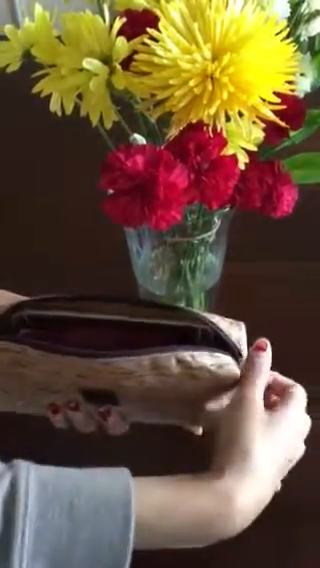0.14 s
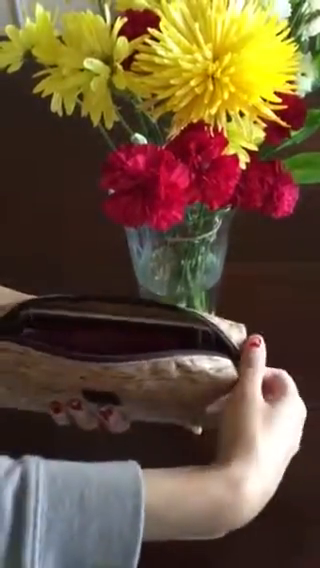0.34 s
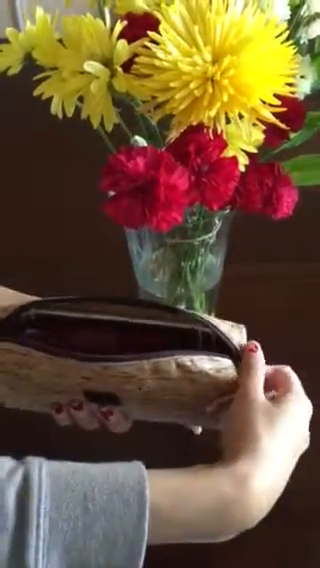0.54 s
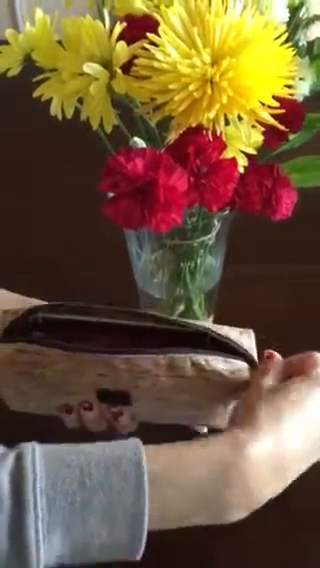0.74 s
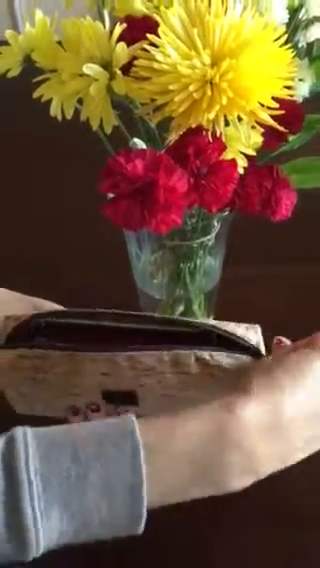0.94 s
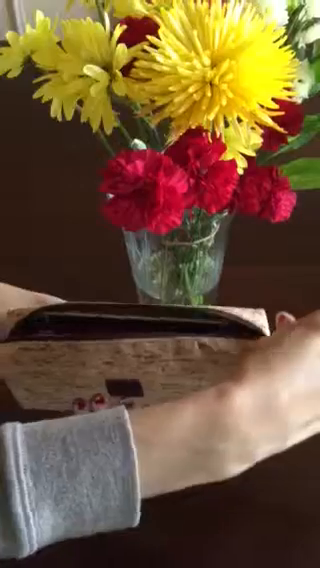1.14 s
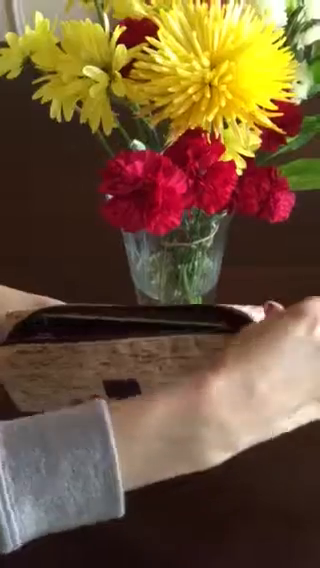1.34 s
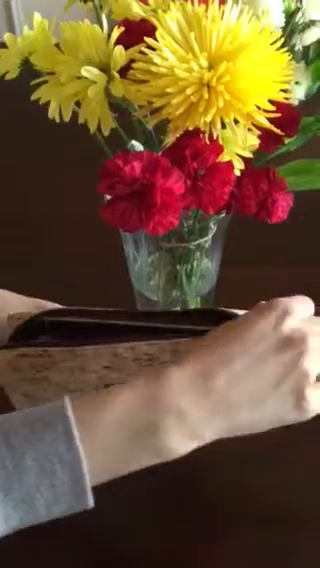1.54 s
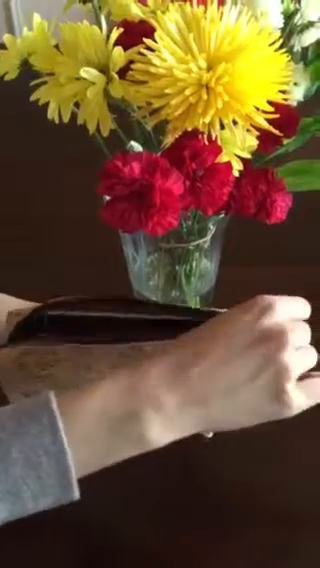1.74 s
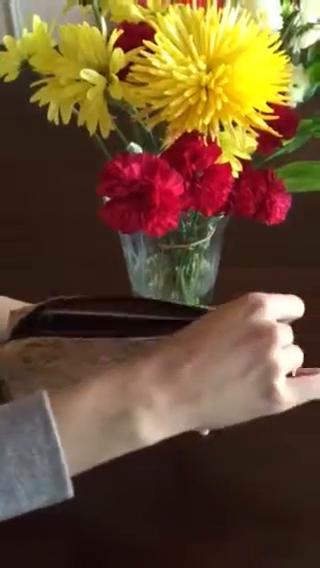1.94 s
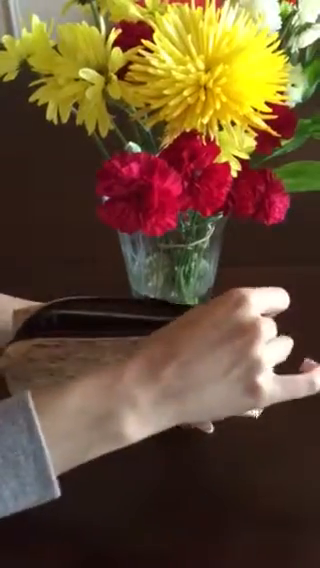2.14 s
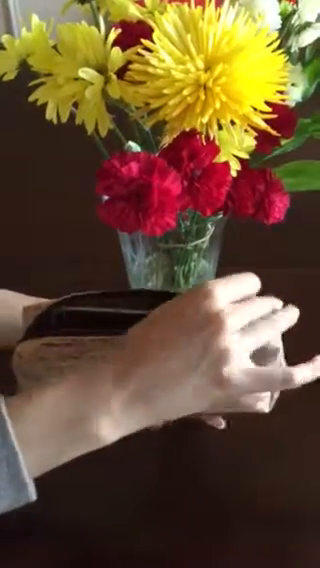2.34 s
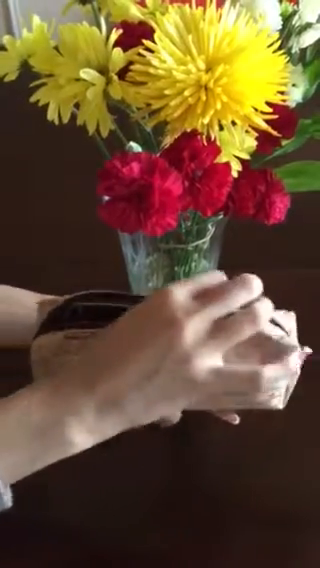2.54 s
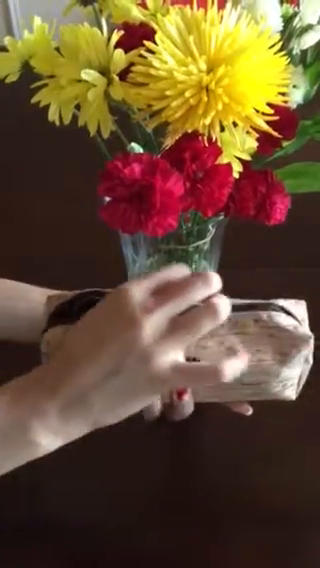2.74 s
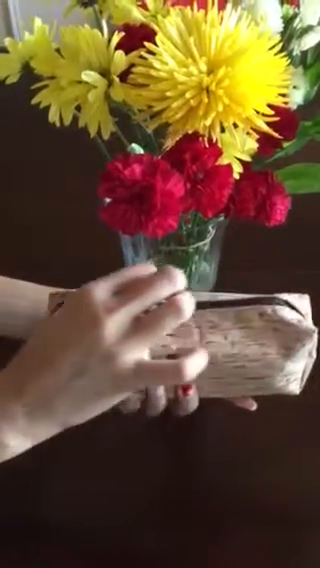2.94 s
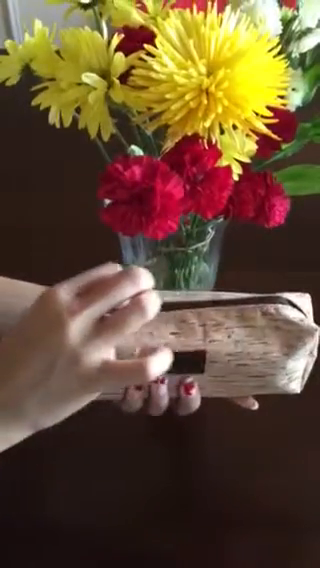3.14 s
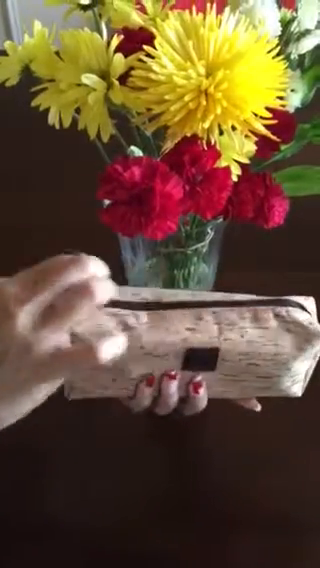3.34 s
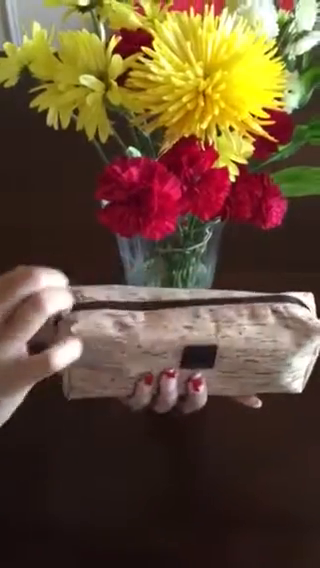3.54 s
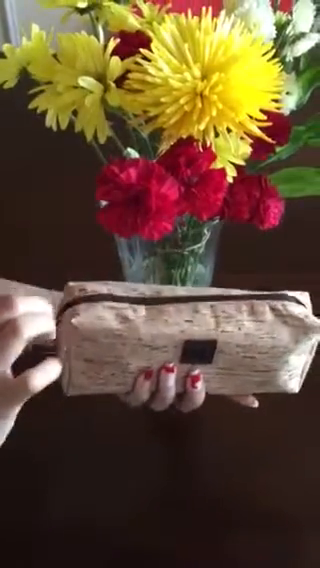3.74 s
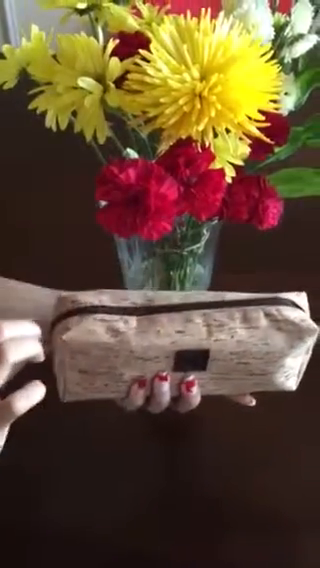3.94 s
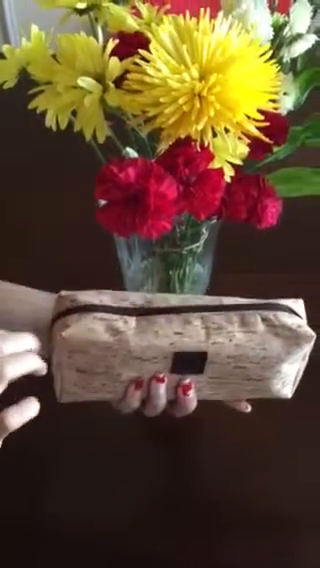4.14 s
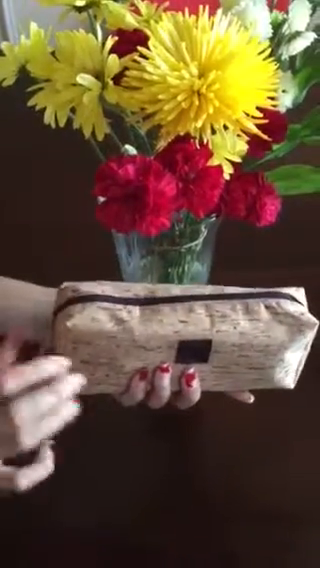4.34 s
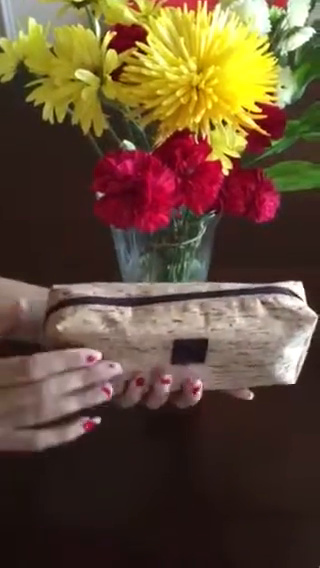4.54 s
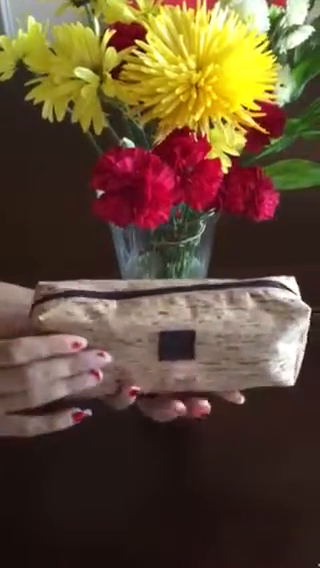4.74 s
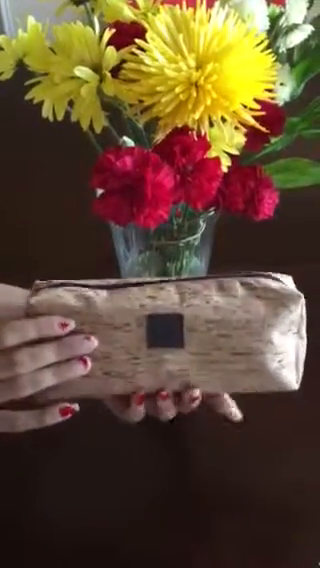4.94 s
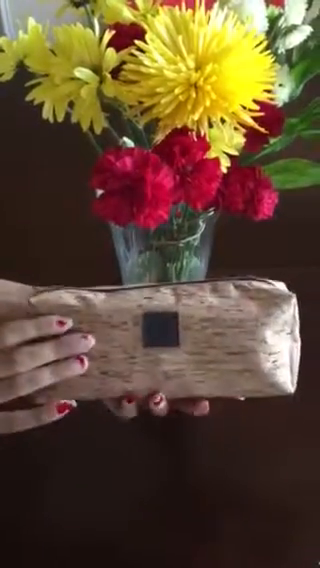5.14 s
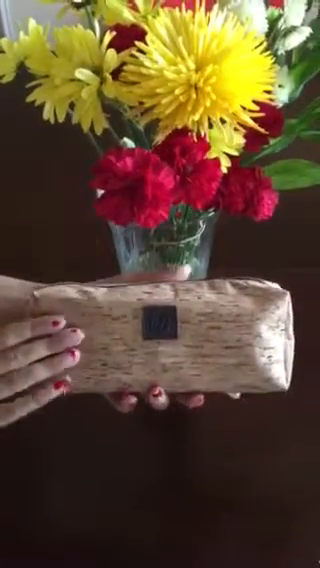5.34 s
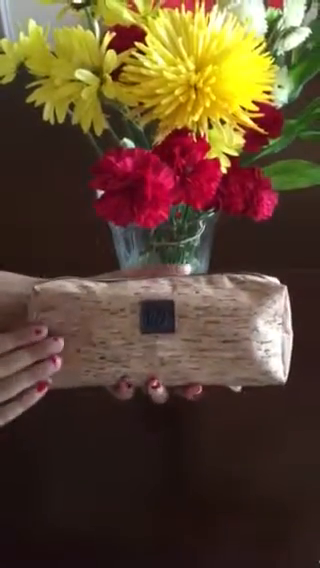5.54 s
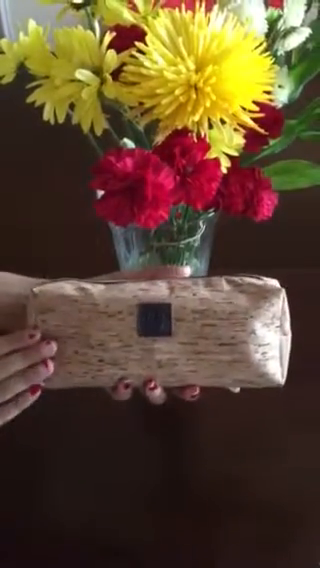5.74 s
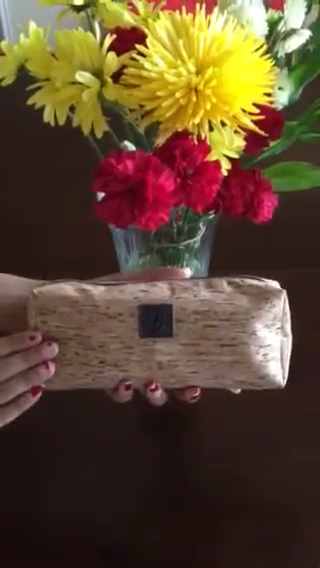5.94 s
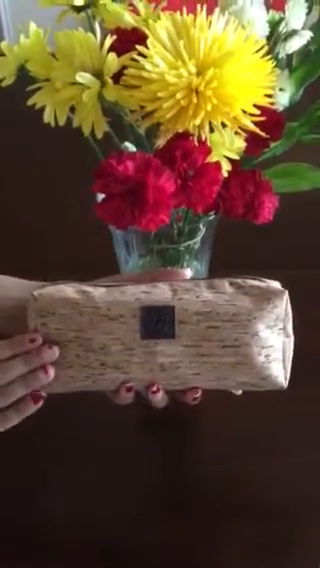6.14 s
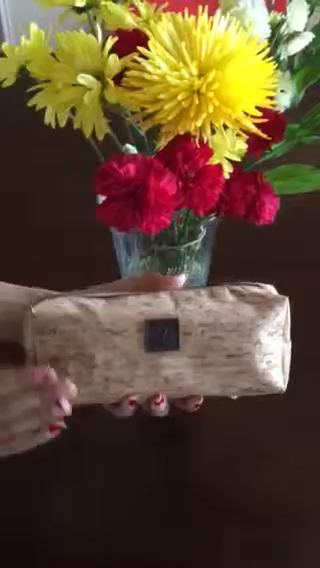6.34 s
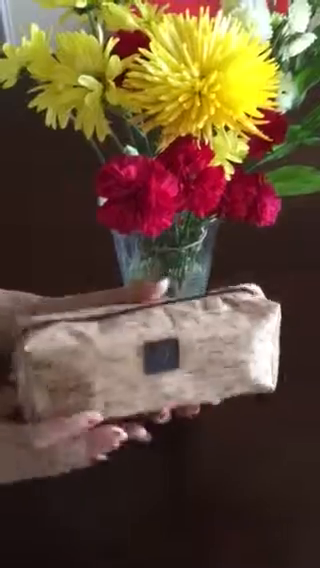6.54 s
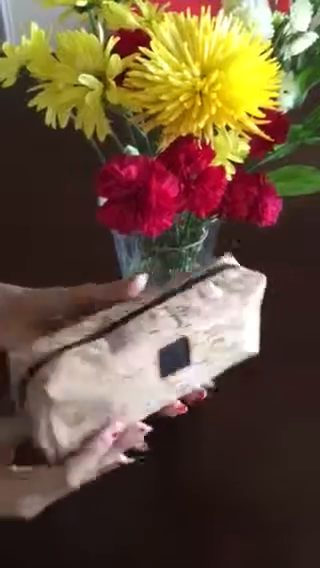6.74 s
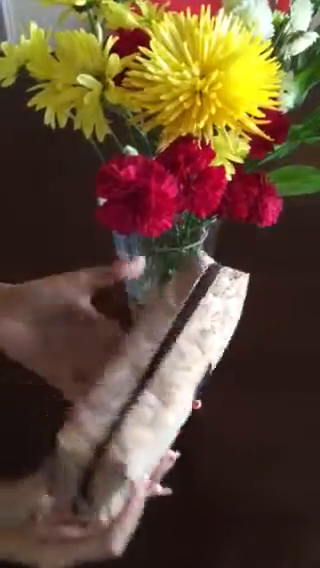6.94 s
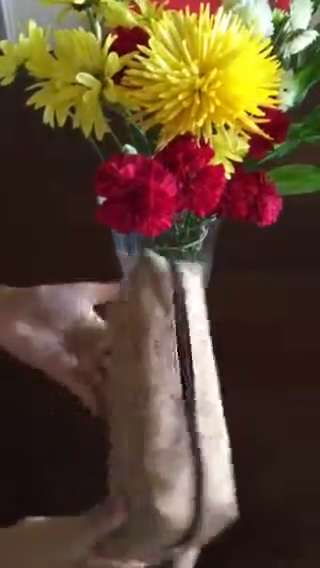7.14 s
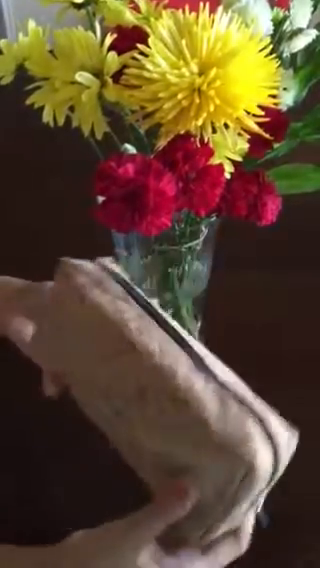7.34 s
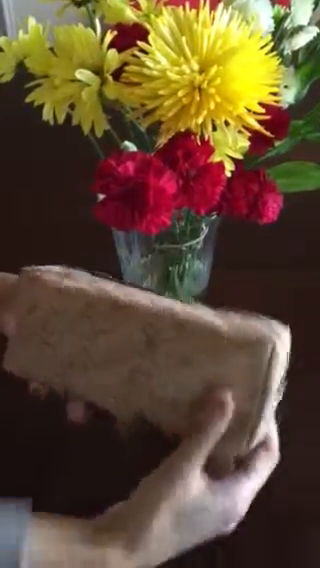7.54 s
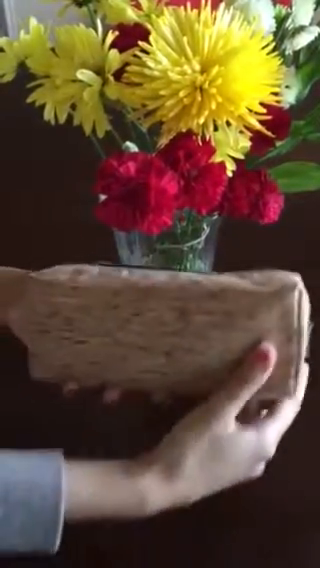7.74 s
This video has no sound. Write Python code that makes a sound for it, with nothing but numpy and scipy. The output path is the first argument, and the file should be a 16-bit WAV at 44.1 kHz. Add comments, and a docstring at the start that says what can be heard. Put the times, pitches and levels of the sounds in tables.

```python
"""Zipping a cork pouch shut

A hand closes a cork pouch in a quiet room. Fingers tug the slider over a few teeth and click its metal tab.
Then the slider ticks over the teeth, speeds up into an uneven buzz, stalls at the far corner
and closes with a last rasp. Each tooth is a tiny push and scrape that rings the pouch.
Palms brush over the cork as shaped hiss, fingernails tap it and it crinkles in tiny random ticks.
Filtered noise makes the room's hiss and rumble and a wavering hum from something in the house."""
import sys
import numpy as np
from scipy import signal
from scipy.fft import rfft, irfft, next_fast_len
from scipy.io import wavfile
from scipy.ndimage import map_coordinates

SR = 44100
rng = np.random.default_rng(int(sys.argv[2]) if len(sys.argv) > 2 else 0)


def transcribe(u):
    """Save the signal u as a 16-bit wav file named by the first command-line argument.

    u: samples, shape (n,) or (channels, n), limited to [-1, 1]; the rate is SR.
    q: integer samples, one column per channel.
    """
    v = np.clip(np.atleast_2d(u).T, -1, 1)
    q = np.round(v * 32767).astype(np.int16)
    wavfile.write(sys.argv[1], SR, q)


N = 342789
TIME = np.arange(N) / SR  # seconds

# the room's hiss: (frequency [Hz], level [dB])
AIR_SPECTRUM = [(150, -15.5), (300, -9), (450, -13), (700, -14), (1100, -15.5), (2000, -17), (5000, -24),
                (10000, -27), (15000, -30.5)]
# the rumble of the house: (frequency [Hz], level [dB])
RUMBLE_SPECTRUM = [(20, -21.5), (33, -15), (45, -1.5), (70, 2), (100, 1), (135, -6), (165, -12.5),
                   (230, -19), (310, -30), (800, -84)]
# how long the room's answer lasts: (frequency [Hz], time to fall by 60 dB [s])
ROOM_DECAY = [(200, 0.16), (1000, 0.18), (3000, 0.14), (12000, 0.16)]

# hiss of skin on cork: (frequency [Hz], level [dB])
CORK_SPECTRUM = [(500, -34), (1200, -5), (3000, 2), (6000, 2), (15500, 1.5)]
# palms slide over the cork: (middle [s], length [s], level [dB], lift of the hiss's peak [dB])
PALM_STROKES = [(0.376, 0.14, -72.5, -3), (5.124, 0.5, -68.5, -2), (5.346, 0.05, -75, 3),
                (5.564, 0.28, -69.5, 6), (6.41, 0.09, -72, 5), (6.625, 0.19, -64.5, 7),
                (6.86, 0.22, -68, -1.5), (7.554, 0.4, -73, 0)]
STROKE_FLATNESS = 3.6  # 2 gives a bell-shaped swell, more a flatter top
HISS_HZ, HISS_OCTAVES = 9600, 0.35  # centre and width of the hiss's peak (a dip where the lift is negative)

# the cork crinkles while it is gripped and turned: (start [s], end [s], relative level [dB])
CRINKLE_SPANS = [(4.896, 5.645, -86.5), (6.752, 7.307, -79.5), (7.452, 7.71, -81)]
# the cork's skin, ticked or tapped: (frequency [Hz], level [dB])
SKIN_SPECTRUM = [(150, -12), (600, 1.5), (1800, 3.5), (3500, 1), (7000, -8.5), (15000, -22.5)]
# fingernails tap the cork: (time [s], relative level [dB], scuff [s], ring [Hz], lift [dB])
NAIL_TAPS = [(4.394, -38.5, 0.0043, 2500, 8), (4.4073, -39, 0.0018, 2660, 15),
             (4.512, -44.5, 0.0026, 4060, 6), (5.111, -41.5, 0.0011, 1800, 5),
             (6.882, -51, 0.0023, 4170, 15), (7.114, -47, 0.0011, 3430, 10),
             (7.498, -49.5, 0.0012, 4270, 8), (7.611, -42.5, 0.0042, 2430, 8),
             (7.624, -44.5, 0.0013, 4300, 5)]

# clicks of the pull tab, each favouring two resonances:
# (time [s], relative level [dB], low ring [Hz], lift [dB], high ring [Hz], lift [dB])
TAB_CLICKS = [(1.744, -37, 805, 16, 1240, 18), (1.750, -28, 1300, 20.5, 4440, -2),
              (1.7518, -23, 775, 20, 1250, 16), (1.866, -28.5, 1480, 9.5, 2660, 11)]
# the tab's overall tone: (frequency [Hz], level [dB])
TAB_SPECTRUM = [(120, -40), (320, 5.5), (480, 0.5), (750, 7), (1000, -1.5), (1550, 0.5), (3400, -4.5),
                (4300, -0.5), (7000, -16.5), (15000, -18)]
# the metal tab, flicked free once, rings on: (frequency [Hz], level [dB], time to fall by 60 dB [s])
FREE_TAB_MODES = [(4350, -63, 0.099), (5850, -61, 0.1)]
FLICK_S = 1.751

# the voice of the pouch, its cavity strongest: (frequency [Hz], level [dB])
POUCH_SPECTRUM = [(100, -33), (170, -2.5), (330, 2.5), (460, -3.5), (620, 2.5), (800, 1), (1050, -4.5),
                  (1550, -9.5), (1900, -11.5), (2280, -18.5), (2700, -19.5), (3200, -20.5), (3600, -24),
                  (5000, -31), (6000, -29), (7500, -35.5), (15000, -42)]
# boom of the walls, strongest with the slider at the corners: (time [s], level against the rasp [dB])
WALL_BOOM = [(1.1, 1.5), (1.36, -8.5), (1.49, 0.5), (2.05, 4.5), (2.2, 6.5), (2.45, 1), (2.85, -6),
             (3.3, -16.5), (3.44, -6), (3.7, -7.5), (3.87, -1.5)]
# the spans of cork that the slider sets ringing, one after another: (time [s], frequency [Hz], lift [dB])
CORK_PANELS = [(0.12, 640, 3.5), (1.1, 1130, 3), (1.5, 445, 10.5), (2.05, 1530, 7.5), (2.17, 620, 7.5),
               (2.35, 372, 1.5), (2.5, 1470, 13), (2.66, 840, 6.5), (2.82, 2370, 7), (2.98, 2090, 3.5),
               (3.14, 1200, 7), (3.37, 1400, 10), (3.45, 698.8, 4), (3.82, 1510, 1)]
PANEL_OCTAVES = 0.19  # width of a panel's resonance
# narrow resonances (and one gap) of the pouch and the slider: (frequency [Hz], lift [dB])
NARROW_RINGS = [(245, -10), (329, 6), (690, 4.5), (788, 5), (860, 6.5), (1301, 3), (1880, 4.5), (2075, 4),
                (5560, 5)]
RING_OCTAVES = 0.022  # their width
# two bright resonances of the toothed tapes glide as the slider travels:
# (time [s], low ring [Hz], lift [dB], high ring [Hz], lift [dB])
TAPE_GLIDES = [(1.5, 2850, 5, 4150, 1.5), (2.1, 2930, 11, 4150, 2), (2.27, 3000, 7, 4100, 12),
               (2.43, 3110, 10, 4300, 4), (2.6, 3070, -3, 4400, -3), (2.83, 2480, 6.5, 4746, 5),
               (3.05, 2561, 5, 4020, 8.5), (3.31, 2715, 11, 3804, 1.5), (3.55, 2901, 5, 4296, 2),
               (3.85, 2641, 5.5, 4800, 5)]
TAPE_OCTAVES = 0.064  # their width
# creases add small random peaks and dips that change along the way: depth, spacing, pace
CREASE_DB, CREASE_HZ, CREASES_PER_S = 3, 166.7, 7

# short tugs drag the slider over a few teeth:
# (time [s], teeth [count], speed [teeth/s], first tooth [relative dB], last tooth [relative dB],
# treble against the rasp [dB])
SLIDER_TUGS = [(0.114, 2, 35, -43, -45.5, -5), (1.086, 4, 100, -28, -37.5, -13),
               (1.131, 1, 70, -29, -31, -25), (1.225, 2, 62, -35.5, -40, -17),
               (1.353, 3, 108, -30.5, -36, -11.5), (1.427, 2, 81, -32.5, -38, -15),
               (1.480, 3, 110, -26, -36, -1.5), (1.518, 2, 22, -34.5, -36.5, -9),
               (2.004, 3, 83, -32, -30, -8.5), (2.041, 6, 78, -32.5, -33.5, -6.5),
               (2.138, 1, 80, -32, -28, -1.5), (2.15, 3, 59, -40, -34.5, -10), (2.209, 5, 60, -37, -33, -7),
               (3.513, 4, 74, -32, -34, -14.5), (3.580, 4, 92, -29.5, -34.5, -12.5),
               (3.637, 3, 62, -27, -29, -14), (3.694, 1, 47, -30.5, -30.5, -18),
               (3.715, 3, 94, -33, -27, -15)]
# the long pull along the top:
# (time [s], speed [teeth/s], relative rasp level [dB], the teeth's treble against the rasp [dB])
TOP_PULL = [(2.296, 65, -52, -7), (2.351, 110, -49, -7), (2.39, 97, -54, -4), (2.492, 78, -50, -8),
            (2.532, 100.5, -49.5, -4), (2.605, 180, -42.5, -6), (2.655, 165, -39, -7),
            (2.70, 91, -41, -8.5), (2.745, 129, -42, -5), (2.80, 119.6, -42.5, -7.5), (2.852, 143, -40, -8),
            (2.906, 106, -46, -6), (3.034, 81, -48, -8), (3.15, 93.4, -45.5, -7), (3.2, 112, -44.5, -6.5),
            (3.28, 91.5, -48.5, -6.5), (3.381, 234, -38, -9), (3.44, 166, -40.5, -9),
            (3.505, 83.6, -52, -6.5)]
# the last quick pull round the far corner:
# (time [s], speed [teeth/s], relative rasp level [dB], the teeth's treble against the rasp [dB])
CORNER_PULL = [(3.752, 87.65, -46, -10), (3.775, 148.3, -42, -11.5), (3.818, 372.5, -36.5, -10),
               (3.86, 327.6, -42, -6.5), (3.895, 181, -53, -23)]
EASY_SPEED = 105  # teeth per second of an easy pull
# the partner tooth against the first at easy speed, its growth with speed, its limit before bunching
PARTNER_DB, PARTNER_DB_PER_OCTAVE, PARTNER_MAX_DB = -11.5, 10.5, -6
FIZZ_DB, FIZZ_DB_PER_OCTAVE = -9.5, 4.5  # lift of the top treble at easy speed, its growth with speed
# the tapes bunch before the far corner, so the partner teeth catch harder
BUNCH_S, BUNCH_WIDTH_S, BUNCH_DB = 3.34, 0.079, 8

TOP_HZ = 15400  # the recorder's band limit


def amp(db):
    """Turn decibels into gain."""
    return 10 ** (np.asarray(db) / 20)


def unit(x):
    """Scale to an average strength (rms) of 1."""
    return x / np.sqrt(np.mean(x ** 2) + 1e-20)


def along(points, hz):
    """Read a table of (frequency, value) on a logarithmic frequency axis."""
    f, v = np.transpose(points)
    return np.interp(np.log(hz + 1), np.log(f + 1), v)


def at(rows, s):
    """Read the columns of a table of curves at time s."""
    knots, *columns = np.transpose(rows)
    return [np.interp(s, knots, column) for column in columns]


def bump(hz, centre, octaves):
    """Draw a bell of height 1 on a logarithmic frequency axis."""
    return np.exp(-.5 * (np.log2((hz + 1) / centre) / octaves) ** 2)


def filtered(x, response):
    """Multiply the spectrum of x by a function of frequency."""
    size = next_fast_len(N + SR // 2)
    hz = np.fft.rfftfreq(size, 1 / SR)
    return irfft(rfft(x, size) * response(hz), size)[:N]


def noise(spectrum):
    """Make coloured noise of rms 1."""
    return unit(filtered(rng.standard_normal(N), lambda hz: amp(along(spectrum, hz))))


def wobble(rate):
    """Draw a smooth random curve through `rate` random points a second."""
    points = rng.standard_normal(int(N * rate / SR) + 4)
    return map_coordinates(points, [TIME * rate])


def ring(gain, lag=0.000721, size=2048):
    """Make a struck body's ring, of energy 1; bending waves bring 1 kHz lag seconds late, the bass later still."""
    hz = np.fft.rfftfreq(size, 1 / SR)
    # folding the cepstrum makes each frequency start as early as the spectrum allows
    cepstrum = irfft(np.log(np.maximum(gain(hz), 1e-6)))
    cepstrum[1:size // 2] *= 2
    cepstrum[size // 2 + 1:] = 0
    bending = 4 * np.pi * np.sqrt(1000 * hz)
    h = irfft(np.exp(rfft(cepstrum) - 1j * lag * bending))
    return h / np.linalg.norm(h)


def contact(scrape_hz, rise, fall, grit=1.0, rattle=0.0, rattle_s=0.001834, size=2048):
    """Make a sharp push, rattling just before and after, in a swell of scraping that takes treble by grit."""
    t = (np.arange(size) - size // 2) / SR
    swell = np.exp(-np.abs(t) / np.where(t < 0, rise, fall))
    scrape = rng.standard_normal(size) * swell
    push = 1.0 * (t == 0)
    rattle_times = rattle_s * np.array([-1, 1]) * (.5 + rng.random(2))
    places = np.searchsorted(t, np.clip(rattle_times, t[0], t[-1]))
    push[places] += rattle * rng.choice([-1, 1], 2)
    push /= np.linalg.norm(push)
    scrape /= np.linalg.norm(scrape)
    # the angle turns from push (0) towards scrape as the frequency climbs
    angle = min(grit, 1) * np.arctan(np.fft.rfftfreq(size, 1 / SR) / scrape_hz)
    return irfft(np.cos(angle) * rfft(push) + np.sin(angle) * rfft(scrape))


def add(track, s, touch, body):
    """Mix a contact, centred on time s and rung through a body, into the track."""
    sound = signal.fftconvolve(touch, body)
    start = max(round(s * SR) - len(touch) // 2, 0)
    part = track[start:][:len(sound)]
    part += sound[:len(part)]


def room(x, delay=.009):
    """The table and walls answer after a short gap (seconds) with a fading wash of noise."""
    hz, t, z = signal.stft(rng.standard_normal(SR // 2), SR, nperseg=256)
    decay = amp(-60 * t / along(ROOM_DECAY, hz)[:, None])
    tail = signal.istft(z * decay, SR, nperseg=256)[1]
    tail = np.pad(tail / np.linalg.norm(tail), (round(delay * SR), 0))
    return signal.fftconvolve(x, tail)[:N]


def background(air_db=-72, rumble_db=-60, hum_hz=119, hum_width_hz=4, hum_db=-57.5, whine_hz=330, whine_db=-87):
    """Faint hiss, the rumble of the house and a wavering hum with a thin tone above it, all from noise."""
    def tone(centre):
        return unit(filtered(rng.standard_normal(N), lambda hz: 1 / (1 + ((hz - centre) / hum_width_hz) ** 2)))

    # keep only the phase of the narrow noise, then give it a new wavering level
    steady = np.cos(np.angle(signal.hilbert(tone(hum_hz))))
    drone = steady * amp(5.2 * wobble(12.0))
    hum = unit(filtered(drone, lambda hz: bump(hz, hum_hz, 0.54)))
    rumble = unit(noise(RUMBLE_SPECTRUM) * amp(1.8 * wobble(6)))
    air = noise(AIR_SPECTRUM)
    return amp(air_db) * air + amp(rumble_db) * rumble + amp(hum_db) * hum + amp(whine_db) * tone(whine_hz)


def palms(grain_db=1.5, flutter_db=1.3):
    """Skin slides over the grain of the cork with a soft hiss that swells, catches and fades."""
    skin = noise(CORK_SPECTRUM) * amp(grain_db * wobble(400) + flutter_db * wobble(45))
    out = np.zeros(N)
    for s, length, db, lift_db in PALM_STROKES:
        swell = np.exp(-np.abs(2 * (TIME - s) / length) ** STROKE_FLATNESS)
        hiss = unit(filtered(skin, lambda hz: amp(lift_db * bump(hz, HISS_HZ, HISS_OCTAVES))))
        out += amp(db) * swell * hiss
    return out


def crinkles(per_second=90, scatter_db=4):
    """The bending cork gives off tiny ticks at random, each ringing its skin."""
    grip = sum(amp(db) * (TIME > start) * (TIME < end) for start, end, db in CRINKLE_SPANS)
    strength = amp(scatter_db * np.clip(rng.standard_normal(N), -2, 2))
    ticks = (rng.random(N) < per_second / SR) * strength
    skin = ring(lambda hz: amp(along(SKIN_SPECTRUM, hz)))
    return grip * unit(signal.fftconvolve(ticks, skin)[:N])


def nails(level_db=10, octaves=0.15, lag=0.00034):
    """Fingernails land on the cork: a clean tick, or a short scuff when they glance off."""
    out = np.zeros(N)
    for s, db, scuff_s, ring_hz, lift_db in NAIL_TAPS:
        body = ring(lambda hz: amp(along(SKIN_SPECTRUM, hz) + lift_db * bump(hz, ring_hz, octaves)), lag=lag)
        touch = contact(scrape_hz=500, rise=scuff_s, fall=scuff_s)
        add(out, s, amp(db + level_db) * touch, body)
    return out


def jingle(attack_s=0.00055):
    """The free metal tab rings thinly: fading sine waves, one for each way it vibrates."""
    t = np.maximum(TIME - FLICK_S, 0)
    modes = sum(amp(db - 60 * t / t60) * np.sin(2 * np.pi * hz * t) for hz, db, t60 in FREE_TAB_MODES)
    return (1 - np.exp(-t / attack_s)) * modes


def clicks(level_db=10, octaves=0.25, rub_db=-12):
    """Small hard contacts ring the tab, each favouring two of its resonances, amid a little rubbing."""
    out = np.zeros(N)
    for s, db, low_hz, low_db, high_hz, high_db in TAB_CLICKS:
        def gain(hz):
            lifts_db = low_db * bump(hz, low_hz, octaves) + high_db * bump(hz, high_hz, octaves)
            return amp(along(TAB_SPECTRUM, hz) + lifts_db)

        hit = contact(scrape_hz=2400, rise=0.00023, fall=0.0046, grit=0.6)
        rub = contact(scrape_hz=200, rise=0.009, fall=0.013)
        add(out, s, amp(db + level_db) * (hit + amp(rub_db) * rub), ring(gain, lag=0.0005))
    return out


def pouch(s, creases, snap_db, fizz_db=0, fizz_hz=4500):
    """The pouch answers one tooth at time s: its fixed voice plus the tapes and panel beside the slider."""
    boom_db, = at(WALL_BOOM, s)
    low_hz, low_db, high_hz, high_db = at(TAPE_GLIDES, s)
    times = np.transpose(CORK_PANELS)[0]
    # one panel fades into the next as the slider passes
    nearness = [np.interp(s, times, row) for row in np.eye(len(times))]

    def gain(hz):
        rings_db = sum(db * bump(hz, centre, RING_OCTAVES) for centre, db in NARROW_RINGS)
        rings_db += low_db * bump(hz, low_hz, TAPE_OCTAVES) + high_db * bump(hz, high_hz, TAPE_OCTAVES)
        crease_place = [np.full_like(hz, s * CREASES_PER_S), hz / CREASE_HZ]
        rings_db += CREASE_DB * map_coordinates(creases, crease_place, order=1, mode='mirror')
        panel_db = sum(near * db * bump(hz, centre, PANEL_OCTAVES)
                       for near, (_, centre, db) in zip(nearness, CORK_PANELS) if near > 0)
        fizz = fizz_db * hz ** 4 / (hz ** 4 + fizz_hz ** 4)
        voice = amp(along(POUCH_SPECTRUM, hz) + rings_db + fizz)
        # the soft walls radiate the bass, the hard teeth the treble, the tape what lies between
        walls = 1 / (1 + (hz / 550) ** 8)
        teeth = 1 - 1 / (1 + (hz / 2200) ** 8)
        shares = (walls, 1 - walls - teeth, teeth)
        # give each share its own level, whatever the voice holds there
        power = sum(amp(2 * db) * np.abs(share) / np.sum(share * voice ** 2)
                    for share, db in zip(shares, (boom_db, 0, snap_db)))
        return voice * amp(panel_db) * np.sqrt(power)

    return ring(gain) * np.sqrt(1 + amp(2 * boom_db) + amp(2 * snap_db))


def tugs(creases, level_db=6, rise_s=0.0012, fall_s=0.0027):
    """Before the pull and where it stalls, the slider jerks over a few teeth, each a rattling contact."""
    out = np.zeros(N)
    for start, teeth, speed, first_db, last_db, snap_db in SLIDER_TUGS:
        for k, db in enumerate(np.linspace(first_db, last_db, round(teeth))):
            s = start + k / speed
            touch = contact(scrape_hz=700, rise=rise_s, fall=fall_s, grit=0.64, rattle=1.0)
            add(out, s, amp(db + level_db) * touch, pouch(s, creases, snap_db))
    return out


def zipper(creases, easy_jitter=.04, jitter_growth=1.3, scatter_db=1.0, partner_lag=.48, level_db=-1.2,
           rise=0.19, fall=0.17):
    """Each tooth snaps into the slider; its partner on the other tape follows, louder and brighter with speed."""
    out = np.zeros(N)
    for pull in (TOP_PULL, CORNER_PULL):
        speed, rasp_db, snap_db = at(pull, TIME)
        moving = (TIME >= pull[0][0]) * (TIME <= pull[-1][0])
        passed = np.cumsum(speed * moving) / SR  # teeth so far
        starts = np.flatnonzero(np.diff(np.ceil(passed)))
        for i, chance in zip(starts, rng.standard_normal((len(starts), 4))):
            gap = 1 / speed[i]
            # the faster the slider runs, the less evenly the teeth land
            jitter = easy_jitter * (speed[i] / EASY_SPEED) ** jitter_growth
            s = TIME[i] + jitter * gap * chance[0]
            partner_s = s + gap * (partner_lag + 2 * jitter * chance[2])
            haste = np.log2(speed[i] / EASY_SPEED)  # octaves above easy speed
            bunching = np.exp(-.5 * ((s - BUNCH_S) / BUNCH_WIDTH_S) ** 2)
            partner_db = min(PARTNER_DB + PARTNER_DB_PER_OCTAVE * haste, PARTNER_MAX_DB) + BUNCH_DB * bunching
            # the two teeth share the energy of one step
            share = np.sqrt(SR * gap / (1 + amp(2 * partner_db)))
            body = pouch(s, creases, snap_db[i], FIZZ_DB + FIZZ_DB_PER_OCTAVE * haste)
            body = body * amp(rasp_db[i] + level_db) * share
            # a slow tooth scrapes longer on its way through the slider
            tooth = contact(scrape_hz=1200, rise=rise * gap, fall=fall * gap,
                            grit=0.53, rattle=0.78, rattle_s=0.000997)
            partner = contact(scrape_hz=400, rise=.2 * gap, fall=.25 * gap)
            add(out, s, amp(scatter_db * chance[1]) * tooth, body)
            add(out, partner_s, amp(partner_db + scatter_db * chance[3]) * partner, body)
    return out


def scene():
    """Mix the pouch, close to the microphone, with the room's answer, the palms and the background."""
    creases = rng.standard_normal(size=(128, 128))
    teeth = zipper(creases) + tugs(creases)
    handling = clicks() + jingle() + nails() + crinkles()
    echo = room(amp(-8.0) * teeth + amp(-7.5) * handling)
    return (teeth + handling + echo + palms() + background())[None]


def record(dry, notch_hz=10450, notch_db=-5, notch_octaves=0.031):
    """The microphone has a narrow dip in the top treble; the recorder keeps nothing above its band limit."""
    def response(hz):
        return amp(notch_db * bump(hz, notch_hz, notch_octaves)) * (hz < TOP_HZ)

    return np.array([filtered(channel, response) for channel in dry])


dry = scene()
out = record(dry)
transcribe(out)
```